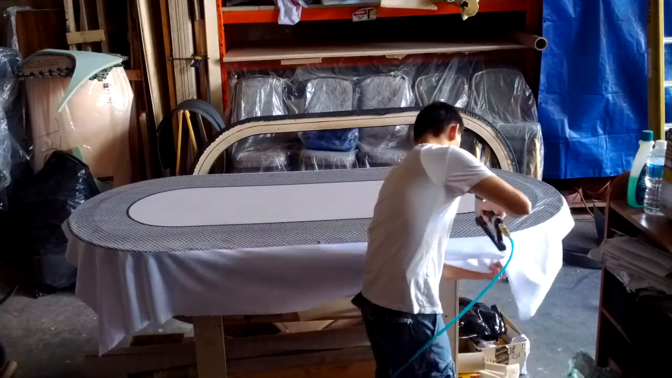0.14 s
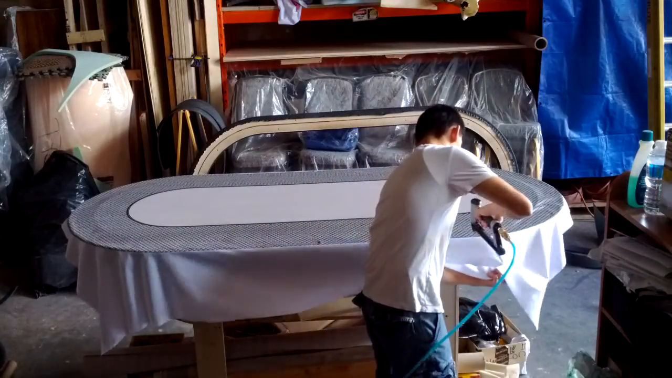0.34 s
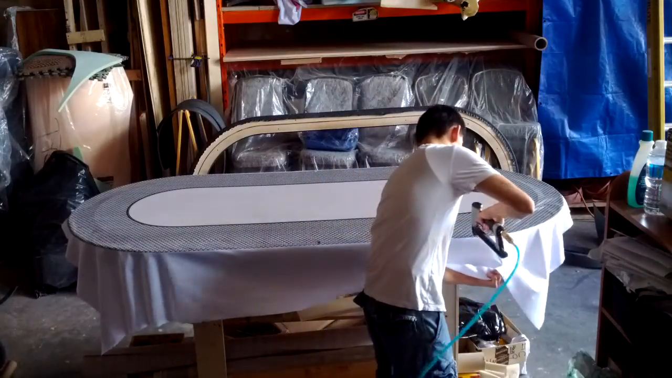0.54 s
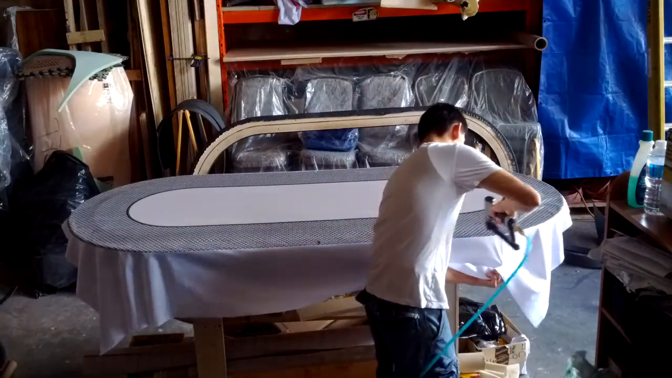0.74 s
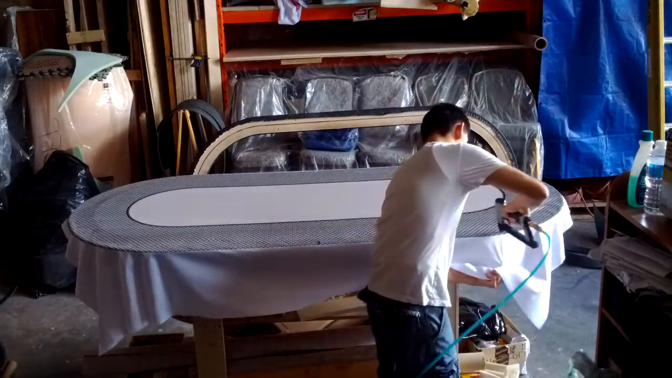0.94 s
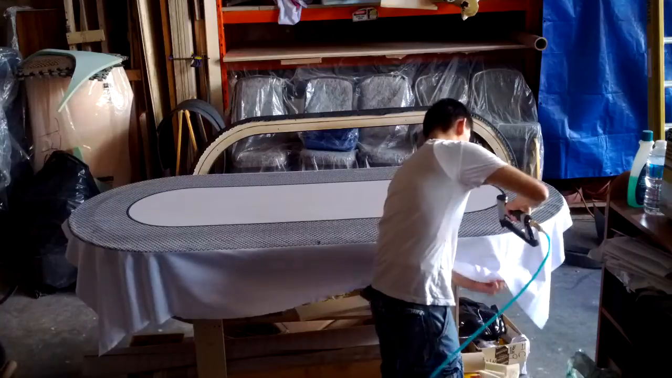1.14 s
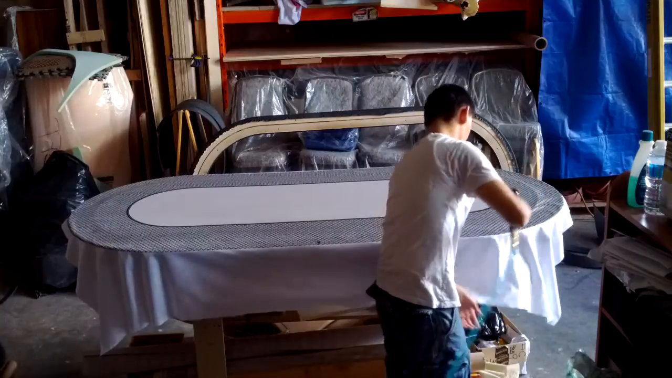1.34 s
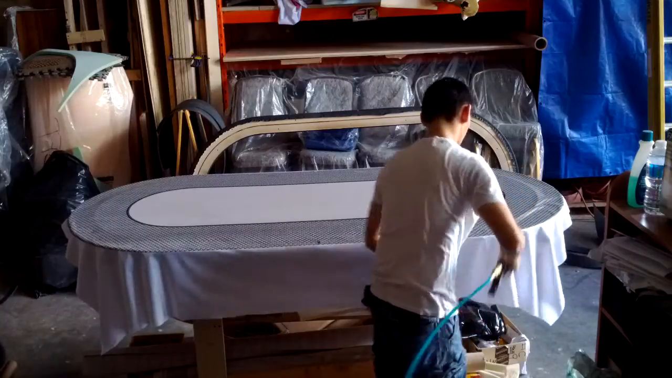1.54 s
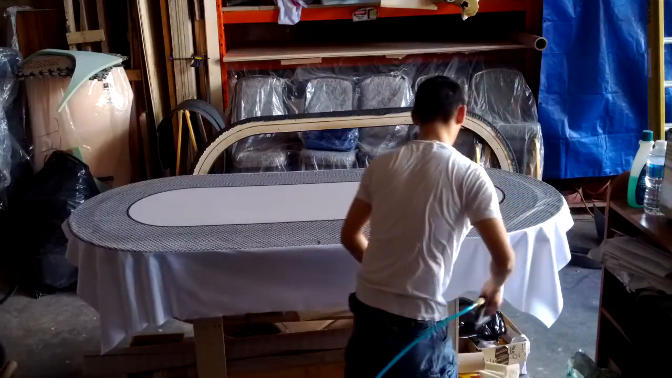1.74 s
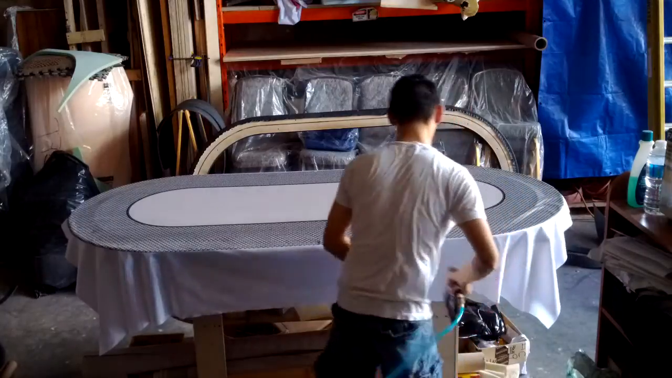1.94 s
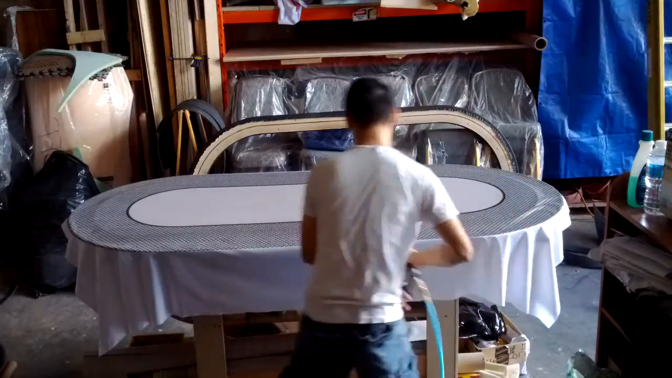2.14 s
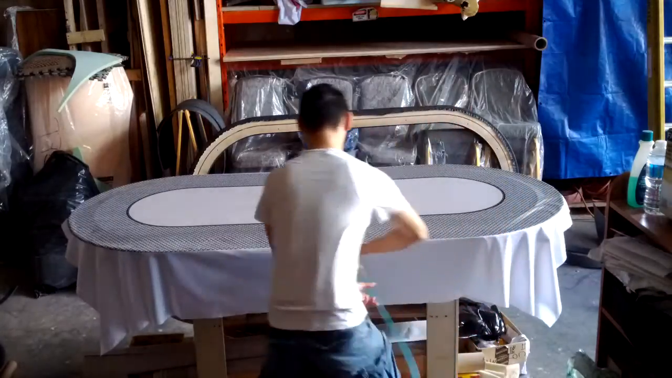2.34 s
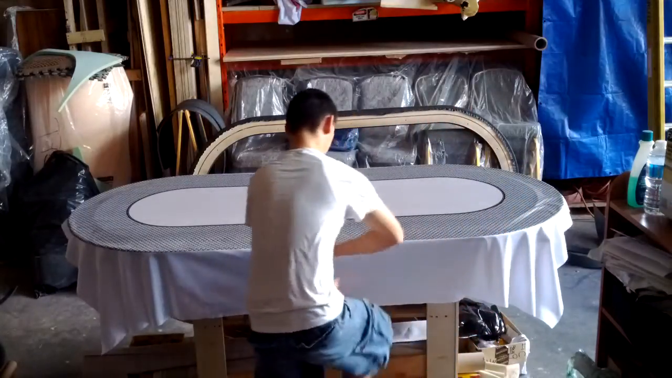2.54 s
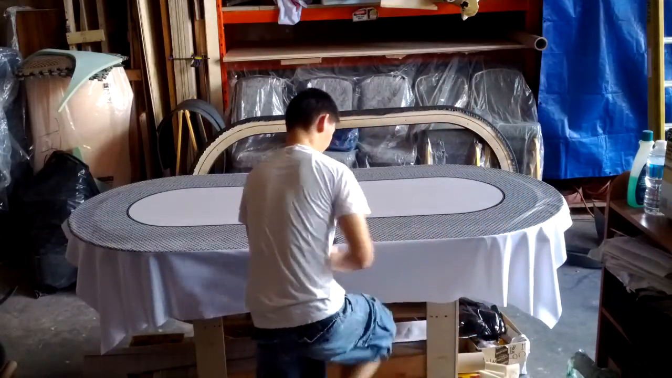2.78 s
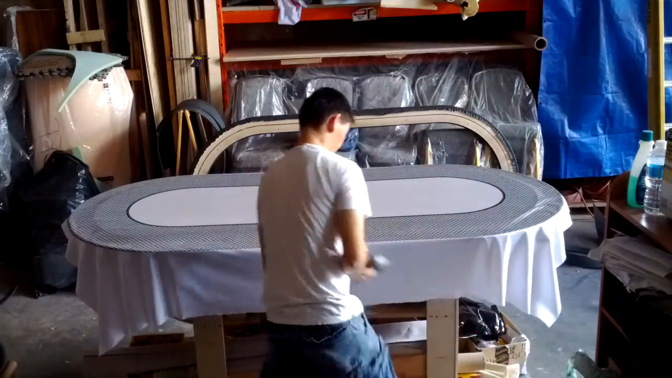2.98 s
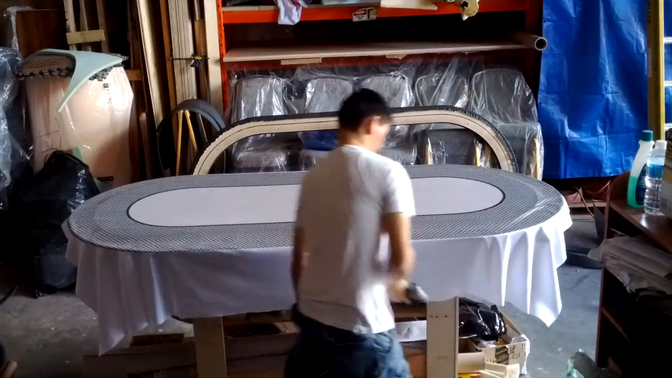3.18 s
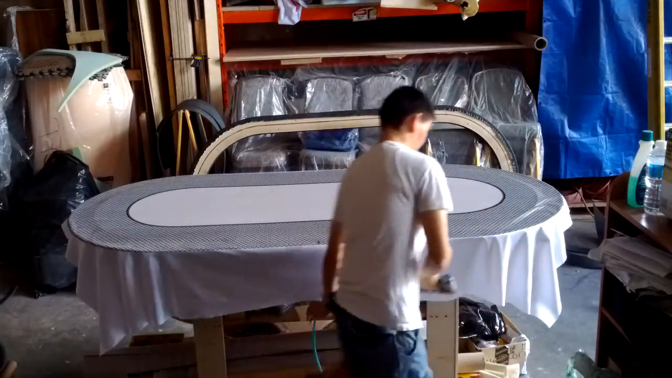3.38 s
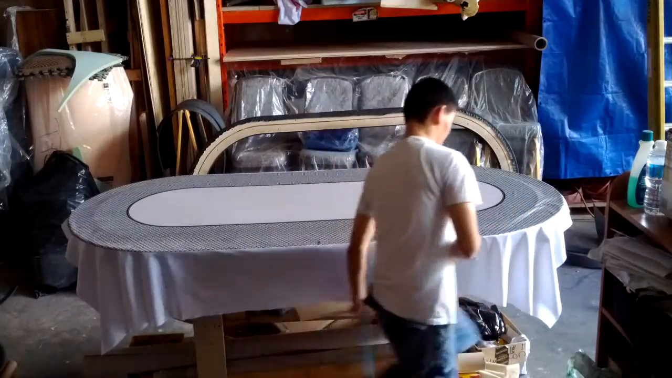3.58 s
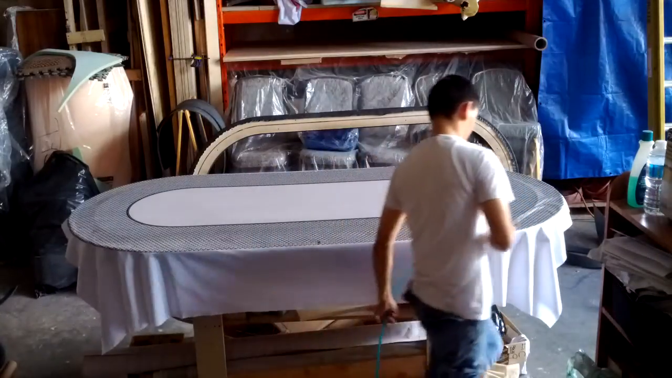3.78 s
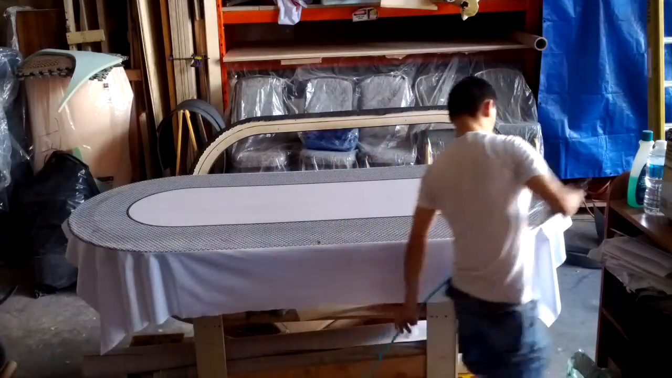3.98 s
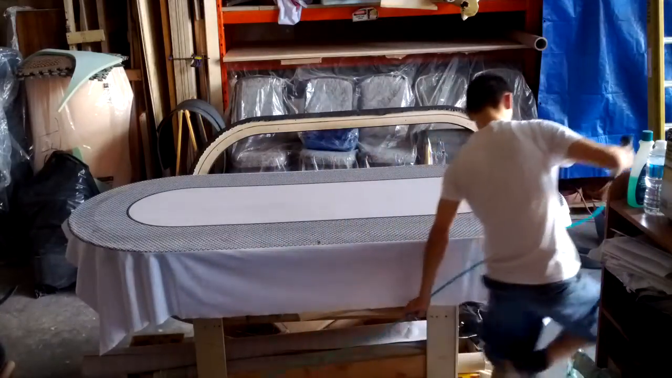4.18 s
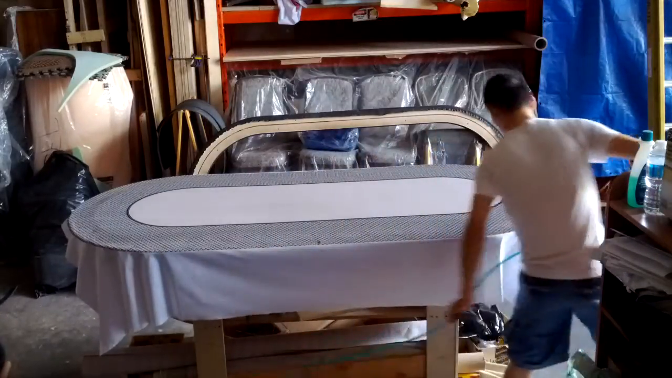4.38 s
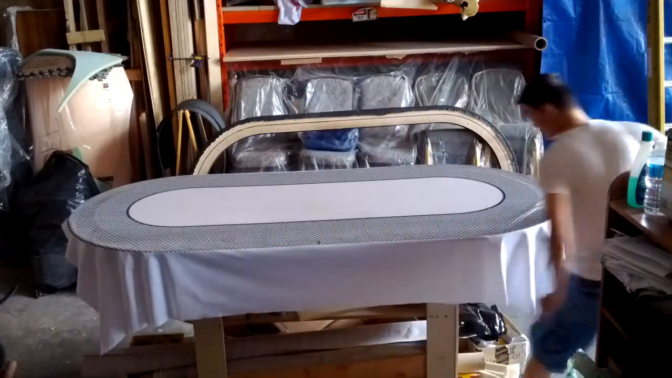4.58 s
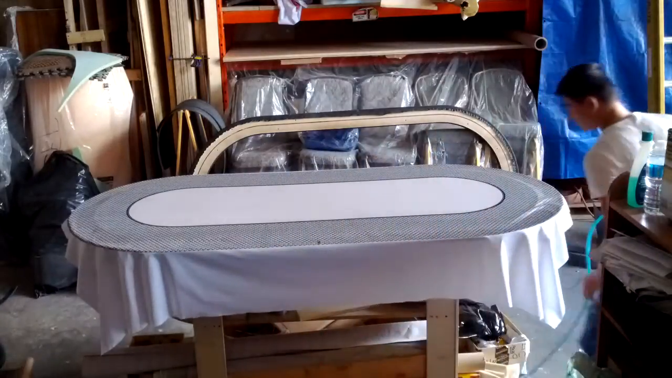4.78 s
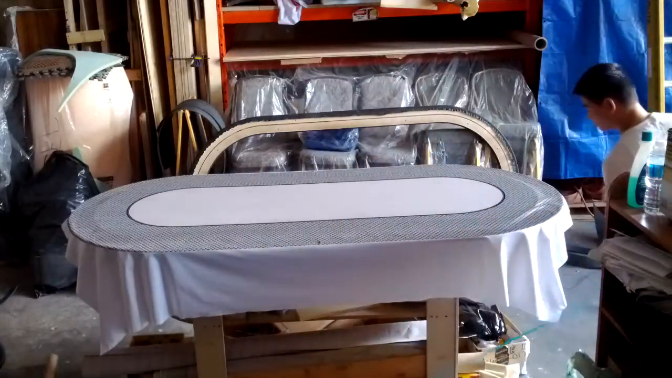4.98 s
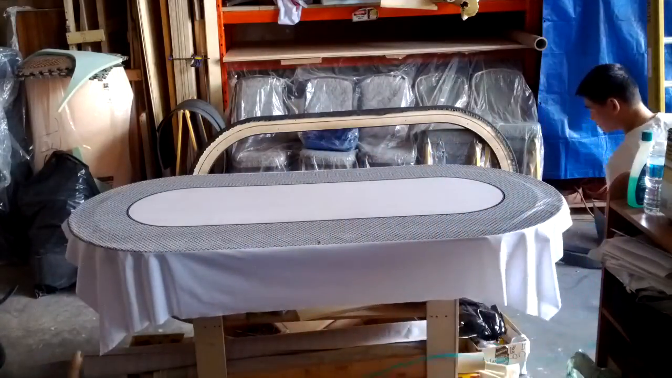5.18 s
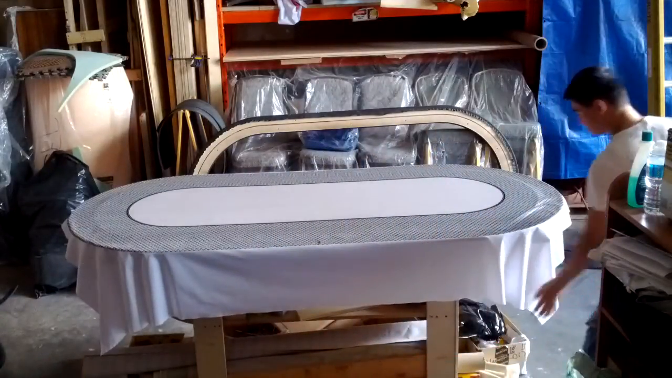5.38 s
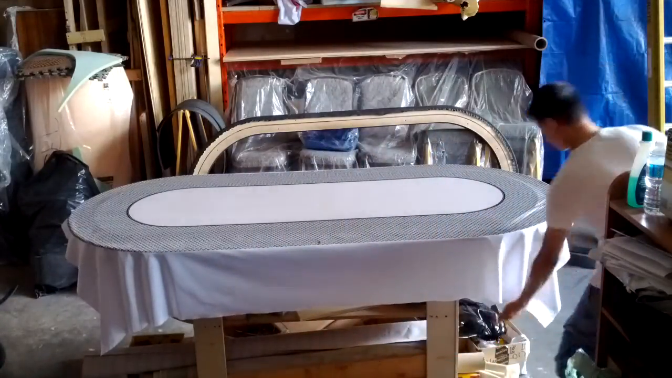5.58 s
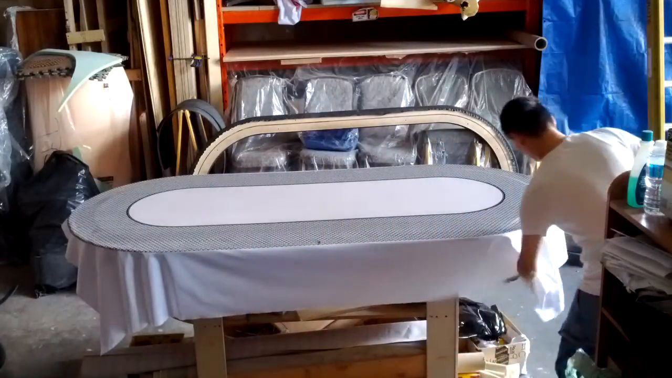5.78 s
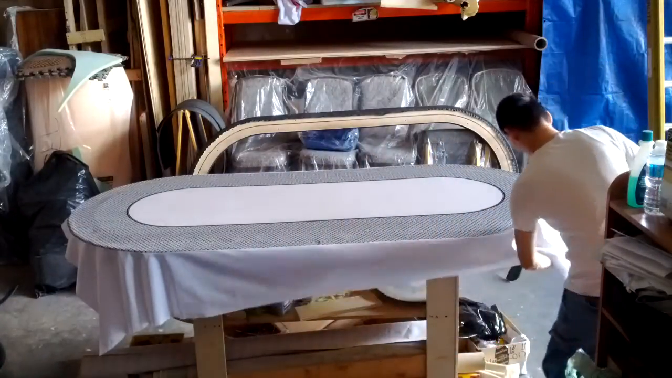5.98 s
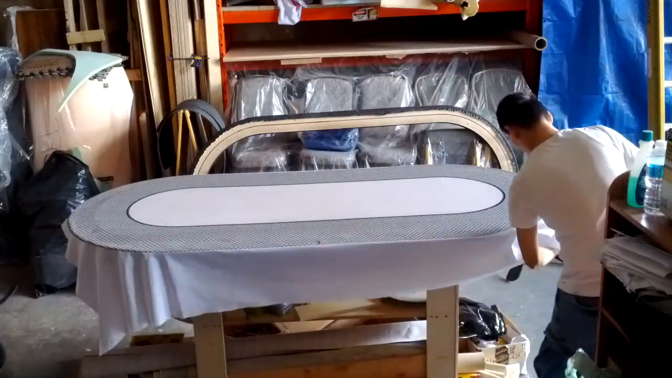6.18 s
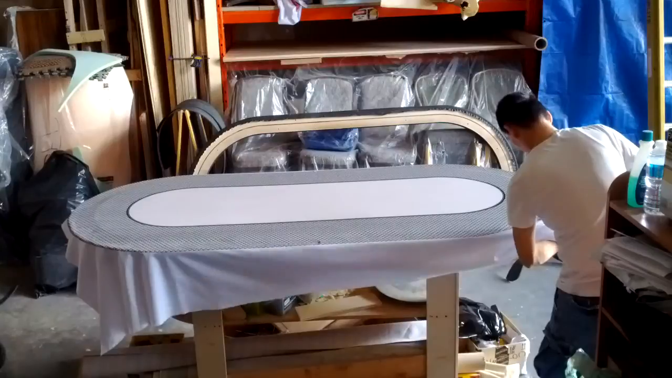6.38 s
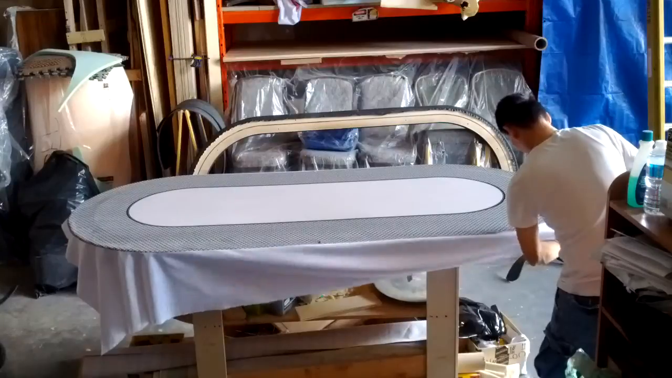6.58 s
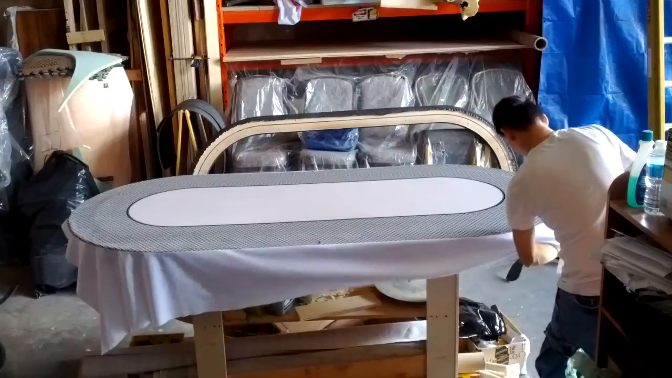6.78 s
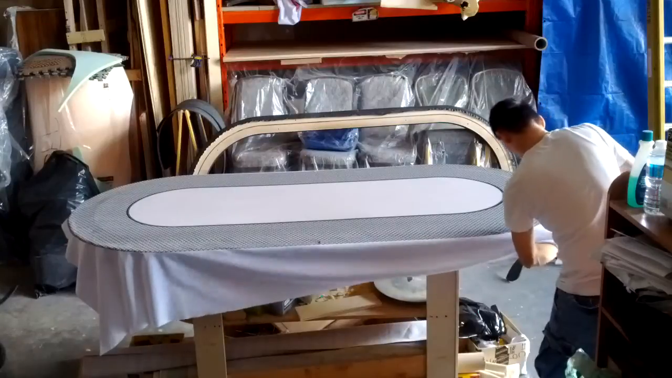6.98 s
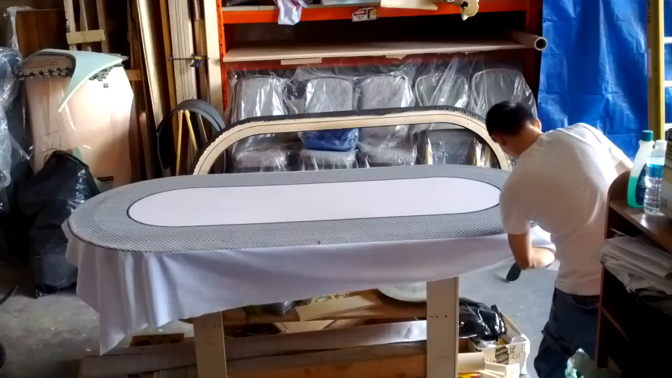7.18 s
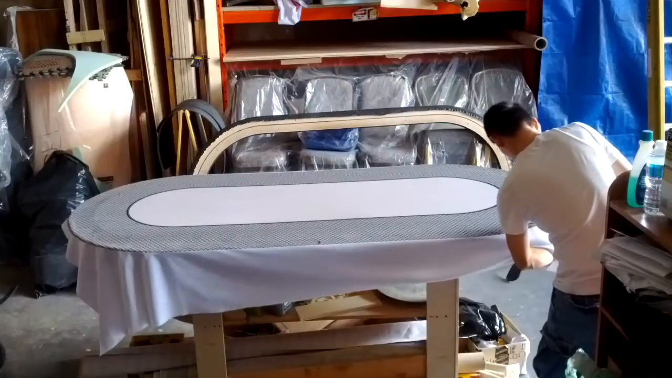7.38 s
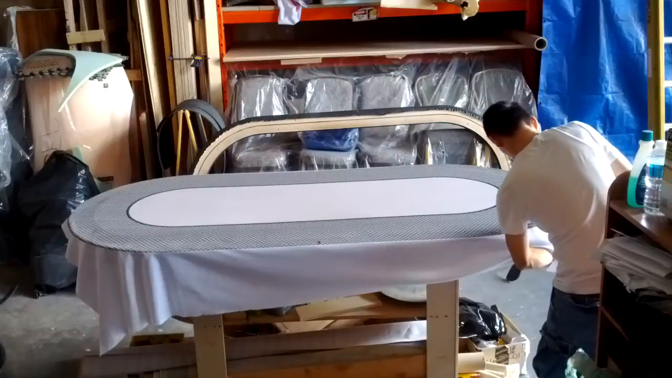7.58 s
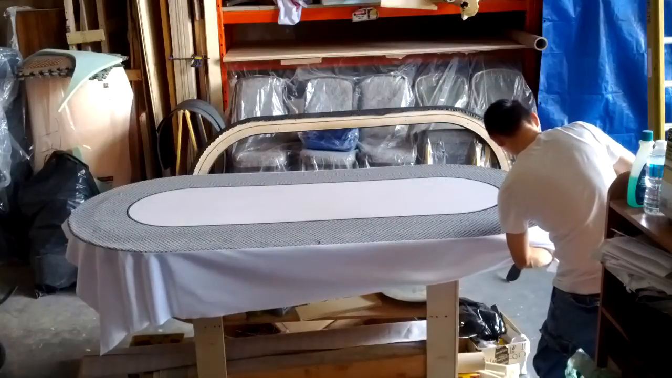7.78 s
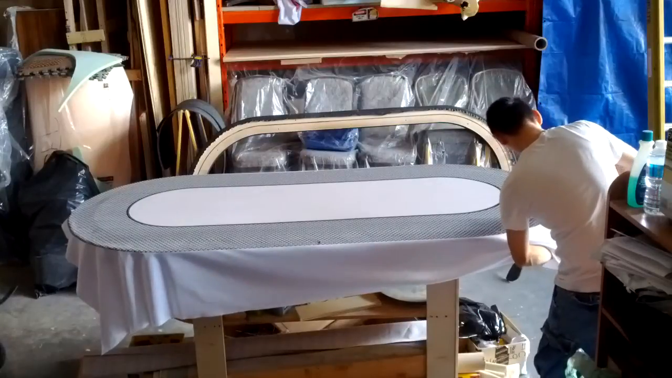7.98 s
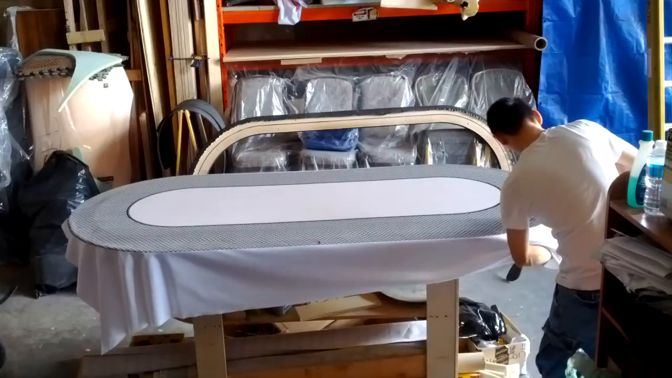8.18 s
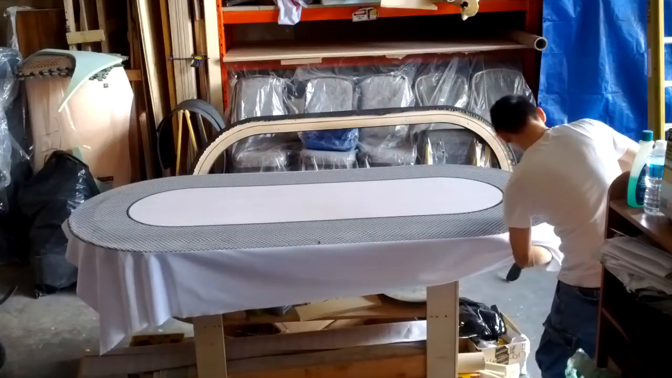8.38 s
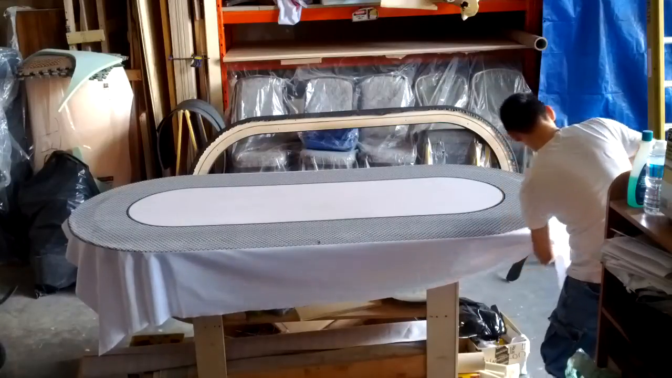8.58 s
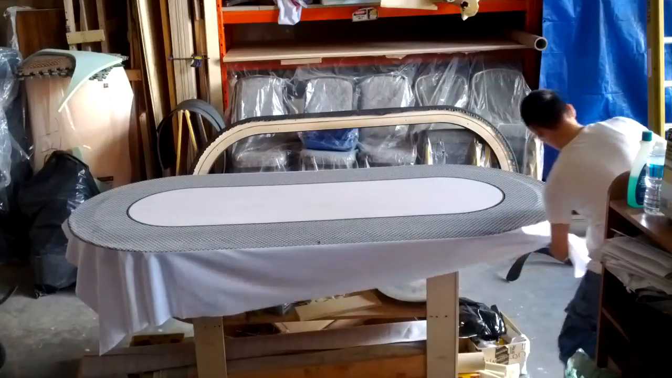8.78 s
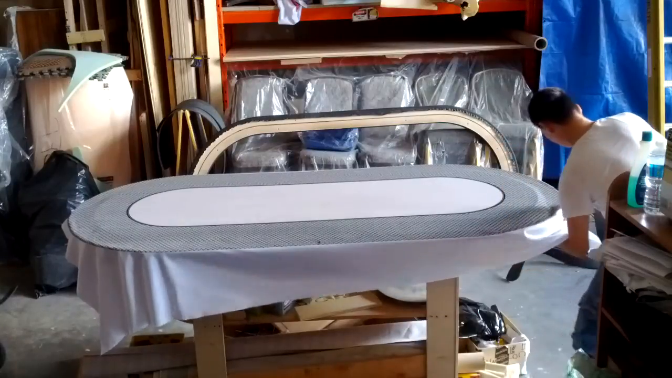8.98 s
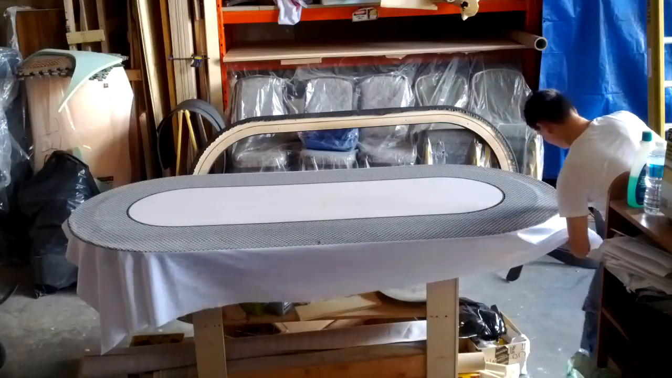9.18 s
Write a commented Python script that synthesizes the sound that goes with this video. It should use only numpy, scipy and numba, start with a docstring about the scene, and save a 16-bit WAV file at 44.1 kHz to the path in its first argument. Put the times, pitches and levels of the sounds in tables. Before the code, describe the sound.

In a hard-walled workshop with low motor hum and rumble, a pneumatic stapler fires two sharp, punchy shots, each followed by a hissing exhaust and a short puff. Faint cloth swishes, hollow knocks and gritty hose scraping follow as the worker walks round the table. After a quieter pause, two more shots come. A fixed microphone a few metres away overloads slightly on the blasts, and the room tail lasts about a second.

```python
"""Pneumatic stapler in a workshop

Four staples go through cloth into a wooden table frame, in two pairs, in a hard-walled room over machine hum.
Each shot layers coloured noise bursts, ringing modes and breathy whistles: air spit, blow, exhaust, last puff.
Between the pairs the worker walks round the table: tool and hose knock (modes and bursts) and drag (gritty noise)
while cloth swishes in soft noise. A limiter and a soft ceiling press down the overloading shots.
"""
import sys
import numpy as np
from scipy import signal
from scipy.fft import rfft, irfft
from scipy.io import wavfile
from scipy.ndimage import uniform_filter1d
from numba import njit

SR = 44100
rng = np.random.default_rng(int(sys.argv[2]) if len(sys.argv) > 2 else 0)


def materialize(psi):
    """Save the field psi as 16-bit PCM at rate SR to the path in sys.argv[1].

    A 1-D psi becomes a single channel; in a 2-D psi each row is a channel.
    """
    bounded = np.clip(np.atleast_2d(psi).T, -1, 1)
    quanta = np.round(bounded * 32767).astype(np.int16)
    wavfile.write(sys.argv[1], SR, quanta)


N = 407484
TIME = np.arange(N) / SR
AGE = np.arange(SR // 2) / SR  # seconds since an event began

# Bright click of a hard edge or a grain of grit. Each row: frequency in Hz, relative level in dB.
CLICK_COLOUR = [(1000, -16), (3500, -10.5), (6000, 2), (8500, -5.5), (12000, 2.5), (16000, -3)]


def undb(db):
    """Decibels to gain."""
    return 10 ** (np.asarray(db) / 20)


def unit(x):
    """Scale to rms 1."""
    return x / np.sqrt(np.mean(x ** 2))


def along(points, hz):
    """Read (Hz, value) points on a log-frequency axis."""
    f, value = np.transpose(points)
    return np.interp(np.log(np.maximum(hz, 1)), np.log(f), value)


def add(track, s, sound):
    """Mix a sound in at time s."""
    i = max(int(s * SR), 0)
    track[i:i + len(sound)] += sound[:N - i]


def noise(spectrum, size):
    """Steady noise of rms 1 with the given colour."""
    gain = undb(along(spectrum, np.fft.rfftfreq(size, 1 / SR)))
    white = rfft(rng.standard_normal(size))
    return unit(irfft(white * gain, size))


def walk(rate, size):
    """Smooth random wander of rms 1, with about rate new values a second."""
    hold = max(int(SR / rate), 1)
    steps = np.repeat(rng.standard_normal(size // hold + 1), hold)[:size]
    return unit(uniform_filter1d(steps, hold))


def tone(hz, db, swell_db, swells_per_s, drift_hz, drifts_per_s):
    """A held tone whose level and pitch wander."""
    phase = 2 * np.pi * np.cumsum(hz + drift_hz * walk(drifts_per_s, N)) / SR
    return undb(db + swell_db * walk(swells_per_s, N)) * np.sin(phase)


def background(swell_db=0.5):
    """Low rumble and thin hiss, with a wavering motor hum, mains hum, a faint high whine and a distant drone."""
    # Colour of the room air. Each row: frequency in Hz, relative level in dB per Hz.
    floor_colour = [(20, -14.5), (50, -5), (75, -6), (125, -1), (180, -8), (260, -12.5), (450, -17),
                    (700, -19), (1260, -23.5), (2000, -31.5), (4000, -30.5), (8200, -37), (12000, -30.5),
                    (16000, -38)]
    floor_db = -51.5  # rms level the swells move around
    air = noise(floor_colour, N) * undb(floor_db + swell_db * walk(11, N))

    # Motor partials, which change colour once. Each row: multiple of the shaft rate, dB before, dB after.
    motor_partials = [(2, -66, -61.5), (3, -70, -59.5), (4, -66, -67.5), (5, -68, -69), (6, -75, -72)]
    shaft_hz, change_s, glide_s = 98.2, 5.57, 0.48
    change = np.clip((TIME - change_s) / glide_s, 0, 1)
    motor = sum(tone(k * shaft_hz, before + (after - before) * change, swell_db=2.5, swells_per_s=1.9,
                     drift_hz=0.2, drifts_per_s=3.6) for k, before, after in motor_partials)

    mains = tone(120, -59, swell_db=3.5, swells_per_s=4, drift_hz=1.3, drifts_per_s=4.5)

    # Thin electrical whine. Each row: multiple of its base rate, level in dB.
    whine_partials = [(3, -82), (4, -80), (5, -70), (6, -77)]
    whine_hz = 2373
    whine = sum(tone(k * whine_hz, db, swell_db=1, swells_per_s=8, drift_hz=6, drifts_per_s=60)
                for k, db in whine_partials)

    # Distant drone that swells and fades. Each row: time in seconds, level in dB.
    drone_levels = [(0, -47), (1.6, -69), (2.9, -63), (3.6, -51.5), (4.8, -57), (5.5, -48.5), (6.2, -62.5),
                    (9.24, -61)]
    drone_db = np.interp(TIME, *np.transpose(drone_levels))
    drone = tone(80.3, drone_db, swell_db=2.5, swells_per_s=8.9, drift_hz=1.5, drifts_per_s=4.3)
    return air + motor + mains + whine + drone


def workshop(x, wet_db, build=0.0054):
    """Direct sound plus a dense tail that loses its treble first; each source meets the walls by its own paths."""
    # Reverberation of the hard walls. Each row: frequency in Hz, time to fall by 60 dB in seconds.
    decay_times = [(100, 0.98), (300, 1.08), (900, 1.165), (2000, 1.213), (3500, 1.113), (5200, 0.93),
                   (7500, 0.74), (11000, 0.54), (16000, 0.38)]
    size = 2 ** 16
    t, hz = np.arange(size) / SR, np.fft.rfftfreq(size, 1 / SR)
    scatter = rfft(rng.standard_normal(size))
    centres, t60s = np.transpose(decay_times)
    tail = 0
    for t60, share in zip(t60s, np.eye(len(decay_times))):
        # overlapping bands: each is full at its own centre and gone at its neighbours'
        band = irfft(scatter * along(np.c_[centres, share], hz), size)
        tail = tail + band * np.exp(-np.log(1000) * t / t60)
    onset = 1 - np.exp(-t / build)
    response = undb(wet_db) * unit(tail * onset) / np.sqrt(size)
    response[0] = 1  # the direct path
    return signal.fftconvolve(x, response)


def burst(start, rise, t60):
    """Envelope that swells to 1 just after start and dies away by 60 dB in t60 seconds."""
    age = AGE - start
    return np.clip(age / rise, 0, 1) ** 2 * undb(-60 * np.maximum(age - rise, 0) / t60)


def blast(spectrum, rise, t60):
    """A short burst with random phases and a smooth spectrum; it carries the energy of its envelope."""
    envelope, size = burst(0, rise, t60), 2 * len(AGE)
    phase = np.angle(rfft(rng.standard_normal(len(AGE)) * envelope, size))
    gain = undb(along(spectrum, np.fft.rfftfreq(size, 1 / SR)))
    sound = irfft(np.exp(1j * phase) * gain, size)[:len(AGE)]
    fade = np.exp(-(AGE / (rise + t60)) ** 2)
    return unit(sound * fade) * np.sqrt(np.mean(envelope ** 2))


def ring(modes, detune):
    """Struck modes; each blow lands elsewhere and shifts them a little."""
    total = 0
    for hz, db, t60 in modes:
        level = undb(db - 60 * AGE / t60) * rng.choice([-1, 1])
        shifted_hz = hz * (1 + detune * rng.standard_normal())
        total = total + level * np.sin(2 * np.pi * shifted_hz * AGE)
    return total


def tilted(x, tilt_db):
    """Hard contacts favour the upper modes, soft ones the lower."""
    centre_hz, reach = 1128, 0.33  # the tilt acts this many octaves either side of the centre
    hz = np.fft.rfftfreq(2 * len(x), 1 / SR)
    octaves = np.log2(np.maximum(hz, 1) / centre_hz)
    gain = undb(tilt_db * np.clip(octaves, -reach, reach))
    return irfft(rfft(x, 2 * len(x)) * gain)[:len(x)]


def knocks(settle=.002, bounce=.004):
    """An edge clicks first; the body lands just after with a hollow clack, a thud and a loose rattle."""
    # Knocks of tool, hose and feet. Each row: start in seconds, relative levels in dB of hollow clack,
    # thud, click and rattle, then tilt of the clack in dB per octave.
    knock_list = [(.525, -40.5, -28.5, -52, -56, -9), (2.187, -44, -41.5, -70, -48, 0),
                  (2.253, -28, -38, -41, -39, 3), (2.956, -47, -57.5, -36, -42, 1),
                  (3.518, -52, -59.5, -68, -58, 1), (4.078, -21.5, -48, -50.5, -35.5, -5),
                  (4.508, -52, -60, -46, -55, 5), (4.55, -60, -42.5, -60, -64, -4),
                  (4.589, -29, -45, -38.5, -59, 5.5), (4.782, -29.5, -50, -36, -49, 8),
                  (4.902, -32.5, -45.5, -42, -42, -1), (5.157, -49, -49, -43, -53, 0),
                  (5.18, -36.5, -48, -57, -57, -3), (5.228, -36, -49, -51, -63, -2),
                  (5.431, -26, -56, -29.5, -33.5, 2)]
    # Hollow ring. Each row: frequency in Hz, relative level in dB, 60 dB decay in seconds.
    clack_modes = [(710, -9.5, 0.076), (882, -2.5, .06), (1172, -2.5, 0.082), (1464, -3.5, 0.06),
                   (1750, -4, 0.035), (2320, -9, 0.067), (3410, -18.5, .025)]
    # Colours of contact noise, soft thud and loose rattle. Each row: frequency in Hz, relative level in dB.
    contact_colour = [(300, -19.5), (800, 0.5), (1500, 2), (2500, -8.5), (5000, -14.5), (10000, -32.5)]
    thud_colour = [(60, -6), (150, -3), (290, -6), (450, 2), (700, -6), (1000, -10.5), (1500, -23.5),
                   (5000, -48.5)]
    rattle_colour = [(500, -15.5), (1500, 0.5), (2300, -3.5), (3200, -0.5), (4500, -10), (8000, -16),
                     (16000, -22)]
    out, size = np.zeros(N), len(AGE)
    for s, clack_db, thud_db, click_db, rattle_db, tilt_db in knock_list:
        click = undb(click_db + 4) * blast(CLICK_COLOUR, rise=0.00091, t60=0.018)
        add(out, s, workshop(click, wet_db=-0.5))
        contact = blast(contact_colour, rise=0.0019, t60=0.015)
        clack = undb(-5) * ring(clack_modes, detune=0.006) + undb(-1) * contact
        rebound = undb(-9.0) * blast(contact_colour, rise=0.00037, t60=0.018)
        add(clack, bounce, rebound[:size // 2])
        thud = undb(1.5) * blast(thud_colour, rise=0.0036, t60=0.058)
        rattle = blast(rattle_colour, rise=0.0015, t60=0.066) * undb(1.9 * walk(500, size))
        body = undb(clack_db) * tilted(clack, tilt_db) + undb(thud_db) * thud + undb(rattle_db) * rattle
        add(out, s + settle, workshop(body, wet_db=-2.5))
    return out


def whistle(start_hz, end_hz, start, fall, width_hz):
    """A breathy port resonance that sinks as the cylinder pressure drops; start is halfway down the fall."""
    still_high = 1 / (1 + np.exp(np.clip((AGE - start) / fall, -20, 20)))
    hz = end_hz + (start_hz - end_hz) * still_high
    phase = 2 * np.pi * np.cumsum(hz) / SR
    # two independent wanders smear the tone into a narrow band of breath
    return unit(walk(width_hz, len(AGE)) * np.cos(phase) + walk(width_hz, len(AGE)) * np.sin(phase))


def stapler(lead=0.0067, air_wet_db=-2, blow_wet_db=-4, port_wet_db=-7):
    """Air leaks and spits into the cylinder, the driver hits, the air blows off, and the trigger valve vents."""
    # Each row: shot time in seconds, then relative levels in dB of valve spit, blow, exhaust,
    # release puff and port whistle.
    shot_list = [(.586, -4, 2.5, -6.5, -7.5, -12.5), (1.041, -3.5, 1.5, -9, -10, -14.5),
                 (7.618, -10, 1, -7.5, -13, -30), (8.298, -8, 0.5, -5.5, -14.5, -30)]
    # Colours of air through narrow valve ports, of driver, staple and frame struck together,
    # and of the exhaust rush. Each row: frequency in Hz, relative level in dB.
    air_colour = [(300, -19.5), (2000, -8), (4500, -5), (6600, -5), (8500, -10.5), (10000, -6), (11400, -3),
                  (12800, -7), (14500, -7.5), (16500, -10)]
    blow_colour = [(40, -25.5), (90, -22), (135, -11), (250, -12), (400, -10), (700, -7.5), (1100, -2.5),
                   (1700, -1.5), (2500, -6.5), (4000, -10), (6000, -15), (8500, -28.5), (16000, -31)]
    exhaust_colour = [(100, -13.5), (500, -13), (1000, -7), (1800, 2.5), (3000, 1.5), (5000, -3.5),
                      (6500, -11.5), (8300, -16), (11300, -10), (13000, -16), (16000, -18.5)]
    # Ring of table frame and tool. Each row: frequency in Hz, relative level in dB, 60 dB decay in seconds.
    frame_modes = [(135, -13.5, 0.46), (679, -7.5, .12), (948, 1.5, .15), (1070, -8, .15),
                   (1660, -0.5, .15), (3040, -6.5, 0.14)]
    trigger_held_s = .112  # the release air begins slightly before this
    out = np.zeros(N)
    for s, spit_db, blow_db, exhaust_db, puff_db, port_db in shot_list:
        add(out, s - lead, undb(-24.5) * blast(air_colour, rise=.004, t60=.08))  # dry leak
        spit = undb(spit_db) * blast(air_colour, rise=0.0071, t60=0.061)
        add(out, s - .003, workshop(spit, air_wet_db))

        blow = blast(blow_colour, rise=0.0024, t60=0.06) + undb(-16.0) * ring(frame_modes, detune=0.0092)
        add(out, s + .011, workshop(undb(blow_db) * blow, blow_wet_db))

        exhaust = undb(exhaust_db) * blast(exhaust_colour, rise=0.037, t60=0.24)
        add(out, s + .012, workshop(exhaust, air_wet_db))
        sinking = whistle(start_hz=5212, end_hz=2479, start=.076, fall=0.0098, width_hz=950)
        sinking = sinking * burst(0.045, rise=0.016, t60=.2)
        add(out, s, workshop(undb(exhaust_db - 4.0) * sinking, port_wet_db))

        puff = undb(puff_db) * blast(air_colour, rise=0.012, t60=0.15)
        add(out, s + trigger_held_s - .017, workshop(puff, air_wet_db))

        # the narrow port sings whenever air passes it, loudest when it faces the microphone
        spit_flow = undb(4.0) * burst(-0.0034, rise=0.0049, t60=0.084)
        exhaust_flow = undb(-6) * burst(0.049, rise=.03, t60=0.23)
        puff_flow = burst(trigger_held_s - .009, rise=0.013, t60=0.12)
        shrill = whistle(start_hz=11320, end_hz=11140, start=.02, fall=0.0085, width_hz=2200)
        shrill = shrill * (spit_flow + exhaust_flow + puff_flow)
        add(out, s, workshop(undb(port_db) * shrill, wet_db=-14.5))
    return out


def cloth(fold_db=2):
    """Shirt and table cover brush past: fluttering noise in soft bell-shaped swells."""
    # Each row: time of the peak in seconds, swell width in seconds, level in dB.
    swish_list = [(2.221, 0.024, -56), (3.18, 0.011, -55), (3.28, 0.025, -58), (3.99, 0.032, -55),
                  (5.94, 0.077, -58.5), (9.07, .04, -52)]
    # Colour of rubbing cloth. Each row: frequency in Hz, relative level in dB.
    cloth_colour = [(300, -15), (1200, -10), (3200, -3.5), (5500, -2), (8000, -9), (12000, -5.5),
                    (16000, -21)]
    swell = sum(undb(db) * np.exp(-((TIME - s) / width) ** 2 / 2) for s, width, db in swish_list)
    folds = undb(fold_db * walk(60, N))
    return workshop(noise(cloth_colour, N) * folds * swell, wet_db=1.5)[:N]


def pull(s, length):
    """Speed of the hose: it gets moving, slides on and comes to rest."""
    attack_s, release_s = 0.026, 0.29  # time to get moving; time to slow by 60 dB
    age = TIME - s
    return np.clip(age / attack_s, 0, 1) * undb(-60 * np.maximum(age - length, 0) / release_s)


def dragging(grit_db=6.0, catch_db=3, tick_db=15, spread_db=4):
    """The hose catches and slips over the gritty floor, and now and then a grain snaps under it."""
    # Pulls of the hose. Each row: start in seconds, length in seconds, relative level in dB.
    pull_list = [(2.974, 0.071, -52), (3.25, 0.07, -66), (4.023, 1.5, -58.5), (4.628, 0.11, -54.5),
                 (5.339, 0.058, -51.5), (5.583, 0.034, -52)]
    # Colour of the slide. Each row: frequency in Hz, relative level in dB.
    slide_colour = [(300, 10), (1200, -2), (2500, -3), (5500, -1.5), (8000, -7.5), (11500, 3),
                    (16000, -2.5)]
    ticks_per_s = 10  # average rate of snapping grains, heard only while the hose moves
    grit = undb(grit_db * walk(900, N) + catch_db * walk(40, N))
    slide = unit(noise(slide_colour, N) * grit)
    snaps = (rng.random(N) < ticks_per_s / SR) * undb(tick_db + spread_db * rng.uniform(-1.1, 1, N))
    ticks = signal.fftconvolve(snaps, blast(CLICK_COLOUR, rise=.0004, t60=0.0063))[:N]
    speed = sum(undb(db) * pull(s, length) for s, length, db in pull_list)
    return workshop((slide + ticks) * speed, wet_db=-1.5)[:N]


def scene():
    """Stapler and handling sounds in the room, over its background."""
    return (stapler() + knocks() + dragging() + cloth() + background())[None]


@njit
def follow(x, attack, release):
    """Level follower, quick up and slow down; both times in seconds."""
    out, e = np.empty(len(x)), 0.
    for i in range(len(x)):
        e += (abs(x[i]) - e) / (SR * (attack if abs(x[i]) > e else release))
        out[i] = e
    return out


def record(dry, threshold=0.5, ceiling=0.59):
    """A limiter ducks the shots, what gets past it is flattened, and the top is cut."""
    level = follow(dry[0], attack=.008, release=0.046)
    limited = dry / np.maximum(level / threshold, 1)
    clipped = limited / (1 + (limited / ceiling) ** 6) ** (1 / 6)
    top_cut = signal.firwin(401, 16100, window="blackman", fs=SR)  # lowpass edge in Hz
    return signal.fftconvolve(clipped, top_cut[None], mode="same")


dry = scene()
out = record(dry)
materialize(out)
```